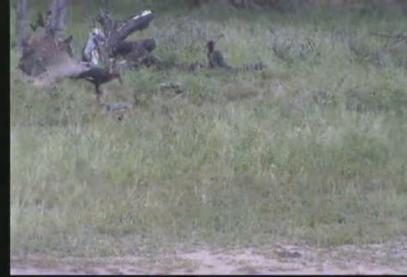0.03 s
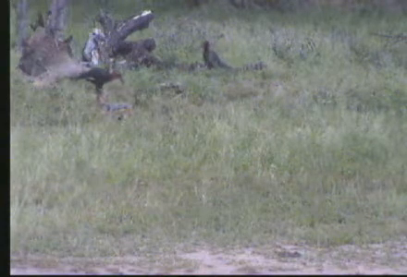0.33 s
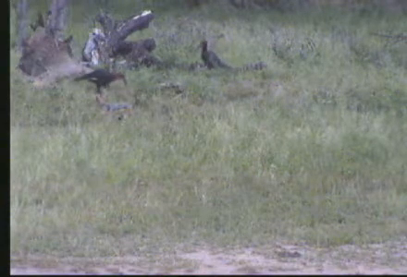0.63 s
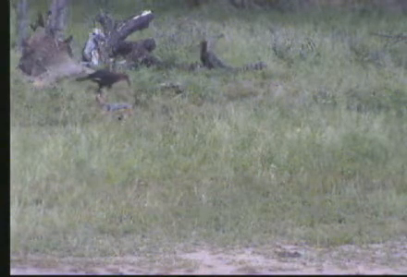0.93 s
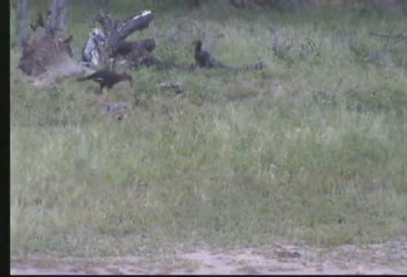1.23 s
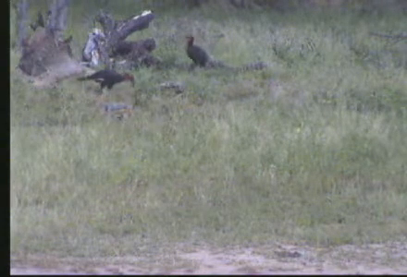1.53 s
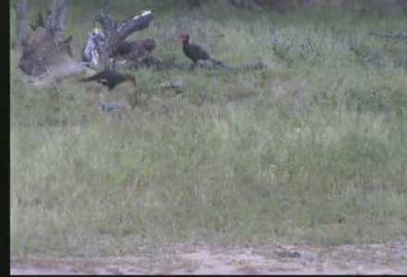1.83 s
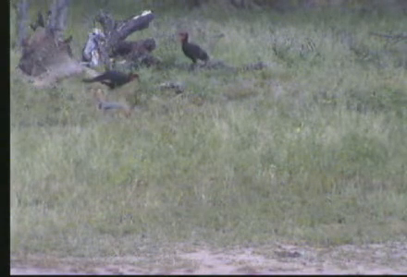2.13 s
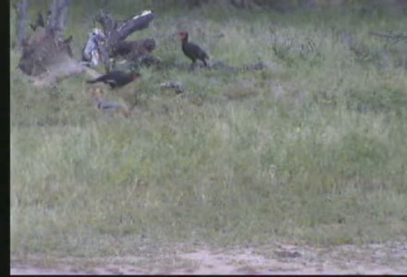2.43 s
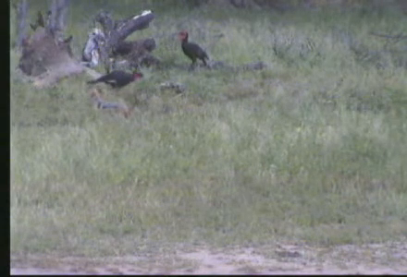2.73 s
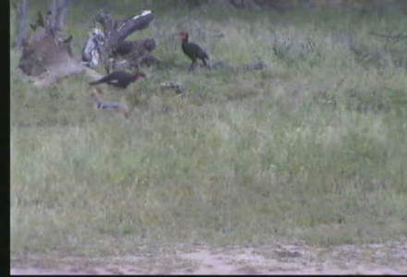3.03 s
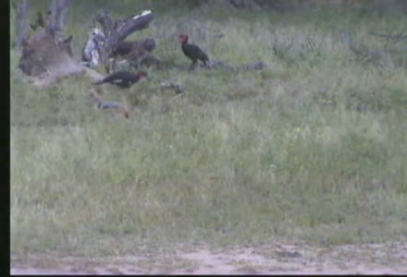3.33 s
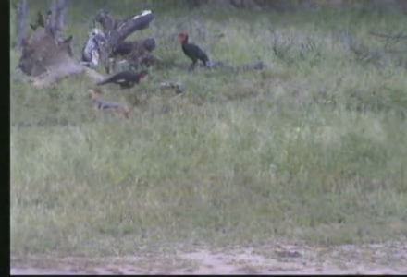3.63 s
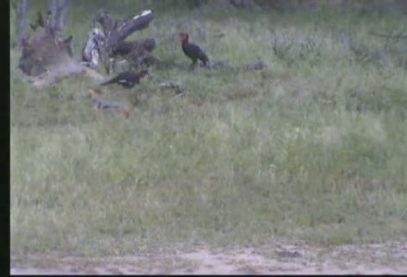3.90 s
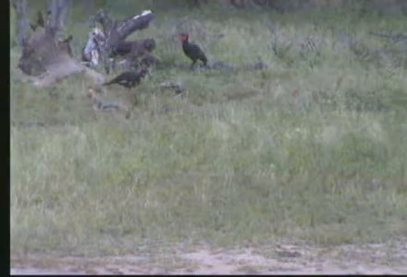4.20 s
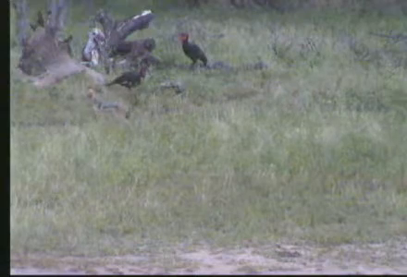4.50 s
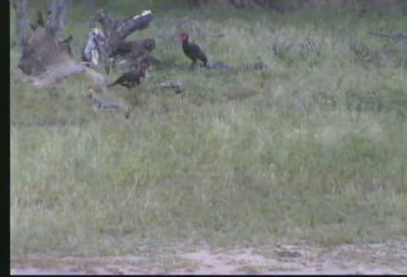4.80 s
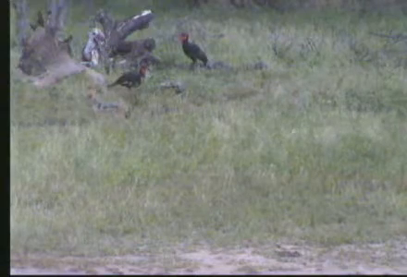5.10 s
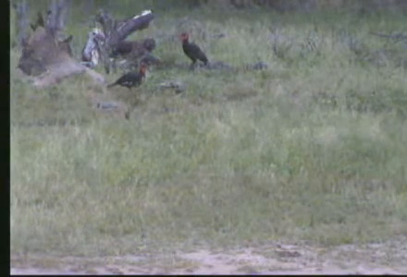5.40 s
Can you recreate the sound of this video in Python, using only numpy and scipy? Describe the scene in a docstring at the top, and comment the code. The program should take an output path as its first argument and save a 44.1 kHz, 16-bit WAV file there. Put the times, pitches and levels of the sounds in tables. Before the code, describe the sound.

In open grassy bush, a bird chatters some way off in two short phrases of quick trills and slurred notes, hoarse and lightly echoing. Then one loud, harsh, hissing screech bursts out close to the microphone, slightly overloading it, and weakens within a second. The chatter returns, followed by a faint, wavering far call. Steady hiss, a low breeze and a faint hum lie underneath.

```python
"""A bird chatters some way off in open grassy bush: short phrases of trills and slurred notes, hoarse
with throat turbulence and echoed by the scrub. Close to the microphone one harsh, hissing screech bursts
out, air rushing through a resonant throat; it starts and ends in sharp voice pulses and overloads the
camera. Behind it all: steady hiss, a low breeze, faint far calls, an insect and the camera's hum."""
import sys
import numpy as np
from scipy import signal
from scipy.fft import rfft, irfft, next_fast_len
from scipy.io import wavfile
from scipy.ndimage import uniform_filter1d, map_coordinates

SR = 44100
rng = np.random.default_rng(int(sys.argv[2]) if len(sys.argv) > 2 else 0)


def materialize(psi):
    """Save the field psi as 16-bit PCM at rate SR to the path in sys.argv[1].

    A 1-D psi becomes a single channel; in a 2-D psi each row is a channel.
    """
    bounded = np.clip(np.atleast_2d(psi).T, -1, 1)
    quanta = np.round(bounded * 32767).astype(np.int16)
    wavfile.write(sys.argv[1], SR, quanta)


N = 244755
TIME = np.arange(N) / SR


def amp(db):
    """Decibels to gain."""
    return 10 ** (np.asarray(db) / 20)


def unit(x):
    """Scale to rms 1."""
    return x / np.sqrt(np.mean(x ** 2) + 1e-20)


def along(points, hz):
    """Read (freq_hz, value) points at hz, on a log frequency axis."""
    freqs, values = np.transpose(points)
    return np.interp(np.log(hz + 1), np.log(freqs + 1), values)


def curves(rows):
    """One value per sample for each column after the time."""
    times, *columns = np.transpose(rows)
    return [np.interp(TIME, times, column) for column in columns]


def wobble(rate, size=N):
    """A smooth random curve, rate knots a second."""
    knots = rng.standard_normal(int(size * rate / SR) + 4)
    return map_coordinates(knots, [np.arange(size) * rate / SR])


def filtered(x, response):
    """Filter x by a gain given as a function of frequency."""
    size = next_fast_len(len(x) + SR // 4)
    return irfft(rfft(x, size) * response(np.fft.rfftfreq(size, 1 / SR)), size)[:len(x)]


def noise(spectrum):
    """Noise of rms 1, coloured by (freq_hz, level_db) points."""
    return unit(filtered(rng.standard_normal(N), lambda hz: amp(along(spectrum, hz))))


def narrow_noise(hz, width_hz):
    """Noise of rms 1 in one bell-shaped band."""
    return unit(filtered(rng.standard_normal(N), lambda f: np.exp(-2 * ((f - hz) / width_hz) ** 2)))


def patchy(x, depth_db, window):
    """x at rms 1, with random gains that change from band to band and moment to moment."""
    bands = signal.stft(x, nperseg=window)[2]
    patches = uniform_filter1d(rng.standard_normal(bands.shape), size=2, axis=0)
    patches = uniform_filter1d(patches, size=7, axis=1)
    return unit(signal.istft(bands * amp(depth_db * unit(patches)), nperseg=window)[1][:N])


def phase(hz):
    """Running phase of a moving pitch."""
    return 2 * np.pi * np.cumsum(hz) / SR


def ramp(start_s, length_s):
    """Rises from 0 to 1 over length_s after start_s."""
    return np.clip((TIME - start_s) / length_s, 0, 1)


def gate(t, start_s, end_s, edge_s):
    """1 between start and end, with soft edges."""
    return np.clip((t - start_s) / edge_s + .5, 0, 1) * np.clip((end_s - t) / edge_s + .5, 0, 1)


def span(start_s, end_s):
    """Sample indices from start to end."""
    return np.arange(max(int(start_s * SR), 0), min(int(end_s * SR), N))


def saturate(x, top, hardness):
    """Round off the peaks near top; the harder, the sharper the knee."""
    return x / (1 + abs(x / top) ** hardness) ** (1 / hardness)


def syrinx(hz, overtones_db, fuzz=0):
    """A bird's voice: a tone with overtones; fuzz smears them into breath, the higher ones most."""
    turn, size = phase(hz), len(hz)
    out = np.zeros(size)
    for k, db in enumerate([0, *overtones_db], 1):
        share = np.clip(fuzz * k, 0, 1)
        breath = wobble(800, size) * np.sin(k * turn) + wobble(800, size) * np.cos(k * turn)
        out += amp(db) * (np.sqrt(1 - share) * np.sin(k * turn) + np.sqrt(share / 2) * breath)
    return out


def slurred_notes(jitter=.05, flutter_db=3, edge_db=-6):
    """Each note bends along one arc; in rough ones the membrane shakes in pitch and strength."""
    # start_s, length_s, start_hz, middle_hz, end_hz, peak_db, peak_place (0-1), roughness (0-1),
    # harmonic2_db, harmonic3_db, harmonic4_db (against the first harmonic)
    notes = [(.16, .028, 1556, 1506, 1560, -30, 0.44, .3, -11.5, -15, -25),
             (.189, .125, 981, 973, 1010, -42, .3, 0.57, 7.5, -3, -4),
             (.29, 0.035, 1593, 1737, 1910, -30, 0.37, 0.42, -19, -10, -29),
             (.312, 0.0307, 892, 1027, 1110, -32.5, 0.83, 0.36, -4, -10, 2.5),
             (.342, 0.026, 1143, 1198, 1245, -32, 0.79, 0.19, 11.5, -2, 2),
             (.368, .04, 2720, 3014, 3540, -22, 0.48, 0.83, -27, -38, -40),
             (.386, .02, 3250, 3400, 3480, -24, .5, .9, -30, -40, -40),
             (.39, .03, 1590, 1740, 1830, -30.5, 0.54, 0.17, -1, -12.5, -28),
             (.402, 0.012, 2360, 2410, 2390, -22, .5, .2, -17, -40, -40),
             (.415, 0.05, 1824, 1870, 1862, -37, 0.52, 0.1, 11, 11.5, -20),
             (.679, 0.0836, 1800, 1644, 1658, -22, 0.58, 0.8, -11, -19, -21),
             (2.193, 0.015, 1728, 1914, 1790, -25, 0.9, 0.17, 5, 3, -24),
             (2.257, .07, 2950, 2726, 2880, -31, .1, 0.41, -18, -39, -41),
             (2.39, .05, 3200, 3230, 3180, -23, .55, 0.39, -31, -40, -40),
             (2.444, 0.031, 1880, 1860, 1830, -25, 0.29, 0.48, -6, 1, -28),
             (2.476, .057, 2560, 2075, 1730, -24, .1, .25, -23, -31, -34),
             (2.497, .058, 3210, 2595, 2390, -26, 0.35, .2, -20, -39, -40),
             (2.531, .049, 1728, 1653, 2260, -19, 0.6, 0.18, -15, -25, -36),
             (2.595, .055, 1380, 1530, 1578, -20.5, 0.93, .15, -24, -26, -28),
             (2.68, .04, 1620, 1600, 1580, -36.5, 0.33, .6, -11, -15, -25),
             (2.861, .012, 1850, 1920, 1900, -28, 0.45, 0.31, -5, -18, -30),
             (4.3, .09, 2850, 2680, 2540, -38.5, 0.7, .8, -25, -30, -40),
             (4.385, .05, 861, 959, 1123, -48, .65, 0.68, 14, 22, -3),
             (4.435, .05, 1200, 1402, 1563, -44, 0.55, 0.91, 17.5, 8.5, -12),
             (4.478, 0.037, 1526, 1720, 1830, -32.5, 0.44, .7, 7, -16, -25),
             (4.483, .04, 2600, 2347, 1870, -24.5, .45, 0.51, -13, -30, -38.5),
             (4.512, .05, 1880, 1938, 1940, -29.5, 0.19, .3, -7, -0.5, -25),
             (4.672, .125, 1451, 1617, 1950, -30, .2, 0.72, -1.5, -12, -17),
             (4.795, 0.0402, 3016, 2935, 2710, -15.5, 0.53, .08, -15, -40, -40),
             (4.832, .045, 2750, 2600, 2580, -33, .15, .25, -15, -40, -39),
             (4.837, .098, 1346, 1130, 1080, -34.5, .36, 1, -15, -10, -17),
             (4.916, 0.041, 1562, 1500, 1614, -23, 0.35, .15, -10.5, -20, -18)]
    out = np.zeros(N)
    for start_s, length_s, start_hz, middle_hz, end_hz, peak_db, place, rough, *overtones_db in notes:
        i = span(start_s - .005, start_s + length_s + .005)
        progress = np.clip((TIME[i] - start_s) / length_s, 0, 1)
        arc_hz = np.polyval(np.polyfit([0, .5, 1], [start_hz, middle_hz, end_hz], 2), progress)
        hz = arc_hz * (1 + jitter * rough * wobble(380, len(i)))
        tone = syrinx(hz, overtones_db, fuzz=.015 + .24 * rough)
        db = peak_db + np.interp(progress, [0, place, 1], [edge_db, 0, edge_db])
        db += flutter_db * rough * wobble(450, len(i))
        out[i] += np.sqrt(2) * amp(db) * tone * gate(TIME[i], start_s, start_s + length_s, .0055)
    return out


def trills(jitter=.025, flutter_db=1.5):
    """Runs of evenly spaced chirps; each swells near its top pitch, then drops ever faster as it fades."""
    # first_s, spacing_s, count, first_top_hz, last_top_hz, fall_hz, first_db, last_db,
    # chirp_length_s, overtone_db
    runs = [(.551, 0.013, 2, 2530, 2730, 250, -7.5, -10, 0.0066, -21),
            (0.57, 0.026, 5, 1530, 1492, 120, -23.5, -21.5, .013, -8),
            (.578, 0, 1, 2950, 2950, 850, -11.5, -10, .014, -12.5),
            (0.606, .022, 4, 2960, 2980, 1100, -9.5, -11, .017, -13),
            (0.683, 0.0077, 6, 2467, 2215, 563, -13.5, -22, .007, -17),
            (2.121, 0.0087, 6, 4340, 4440, 450, -17, -18.5, 0.0035, -31),
            (2.132, .0107, 5, 2900, 3150, 1300, -19.5, -16.5, .007, -7),
            (2.35, .0117, 8, 3150, 3350, 1700, -20, -12.5, .0085, -14),
            (4.492, 0.0055, 4, 2890, 2464, 663, -26, -25, .008, -18),
            (4.696, 0.017, 2, 2670, 2757, 800, -20, -14, 0.014, -12),
            (4.7275, .014, 2, 2900, 3100, 800, -5, -4, .008, -16),
            (4.758, 0, 1, 3190, 3200, 600, -12, -10, .004, -17)]
    # the throat favours overtones near one resonance: freq_hz, gain_db
    throat = [(2800, -6), (4300, -18), (5000, -8.5), (5700, 5), (6100, 0), (6500, -13.5), (7200, -26.5)]
    out = np.zeros(N)
    for (first_s, spacing_s, count, first_hz, last_hz, fall_hz,
         first_db, last_db, length_s, overtone_db) in runs:
        for n, progress in enumerate(np.linspace(0, 1, count)):
            middle_s = first_s + n * spacing_s
            db = first_db + progress * (last_db - first_db)
            top_hz = first_hz + progress * (last_hz - first_hz)
            i = span(middle_s - length_s, middle_s + length_s)
            offset = (TIME[i] - middle_s) / length_s
            hz = top_hz - fall_hz * np.clip(offset + .5, 0, 1.1) ** 1.6
            swell = np.exp(-6 * offset ** 2) * amp(db + flutter_db * wobble(700, len(i)))
            overtones_db = [overtone_db + along(throat, k * hz) for k in (2, 3, 4)]
            out[i] += swell * syrinx(hz * (1 + jitter * wobble(914, len(i))), overtones_db)
    return out


def rasp(mid_trim_db=-7, high_trim_db=-3, nasal_trim_db=-2, grain_db=1.5):
    """Turbulence in the chattering bird's throat: hoarse bursts, each with its own throat size."""
    # bursts: peak_s, rise_s, fall_s, mid_db, mid_centre_hz, high_db, nasal_db
    bursts = [(.17, 0.12, 0.28, -28.5, 2900, -35.5, -50), (.385, 0.062, 0.23, -19.5, 3430, -42, -50),
              (.585, 0.051, 0.19, -19, 2520, -28.5, -25), (.70, 0.24, 0.17, -23.5, 2500, -21, -31.5),
              (2.165, 0.064, 0.18, -22, 3000, -28.5, -30), (2.405, 0.2, .16, -19, 2800, -35.5, -31.5),
              (2.504, 0.17, 0.36, -20.5, 3020, -34, -38.5), (4.25, 0.44, .3, -35.5, 2800, -46, -55),
              (4.499, 0.4, 0.14, -24, 2820, -40, -52), (4.56, .042, .45, -26.5, 2900, -31.5, -33),
              (4.725, 0.058, .33, -18, 2800, -22, -25), (4.93, 0.17, 0.21, -27, 3000, -30, -33),
              (5.25, 0.19, 0.35, -37, 2900, -30.5, -46)]
    # the rasp's middle band, high band and narrow nasal ring: freq_hz, level_db
    mid_band = [(900, -25), (1500, -7), (2100, -4), (2900, -0.5), (3700, -3), (4500, -10.5), (5500, -30.5)]
    high_band = [(3500, -49), (4700, -3), (5300, -2.5), (5750, -2.5), (6300, 2.5), (7100, -9)]
    nasal_band = [(4900, -38.5), (5400, -6.5), (5680, 0), (5950, -9.5), (6400, -40)]
    mid, high_gain, nasal_gain = np.zeros((3, N))
    for peak_s, rise_s, fall_s, mid_db, centre_hz, high_db, nasal_db in bursts:
        fade_db = 15 * np.maximum((peak_s - TIME) / rise_s, (TIME - peak_s) / fall_s)
        throat = [(hz * centre_hz / 2900, db) for hz, db in mid_band]  # moves the peak to centre_hz
        mid += amp(mid_db + mid_trim_db - fade_db) * noise(throat)
        high_gain = np.hypot(high_gain, amp(high_db + high_trim_db - fade_db))
        nasal_gain = np.hypot(nasal_gain, amp(nasal_db + nasal_trim_db - fade_db))
    grain = unit(amp(grain_db * wobble(300)))
    return grain * (mid + high_gain * noise(high_band) + nasal_gain * noise(nasal_band))


def effort(end_s, sag_start_s=3.02, drop_start_s=3.43, sag_db_per_s=15):
    """The screech's strength in dB against its peak: it holds, sags, drops to a weak tail and lets go."""
    sag_db = sag_db_per_s * np.clip(TIME - sag_start_s, 0, drop_start_s - sag_start_s)
    drop_db = 9 * ramp(drop_start_s, .078)
    release_db = 7 * ramp(end_s - .045, .045)
    return -sag_db - drop_db - release_db


def whistle(hz):
    """A narrow throat resonance of rms 1, shaken in pitch and strength by the airflow."""
    turn = phase(hz * (1 + .012 * wobble(70)))
    return unit(wobble(230) * np.sin(turn) + wobble(230) * np.cos(turn))


def screech(start_s=2.888, end_s=3.736, level_db=-7, throat_hz=6010, mouth_hz=2800, sink_hz_per_db=33.5):
    """Chaotic airflow through a throat that opens, holds and closes, with resonances riding on it."""
    # the throat's four shapes in turn: freq_hz, level_db
    opening = [(710, -60), (1200, -25), (1970, -19.5), (2150, -15), (2520, -25), (2710, -11), (3160, -3),
               (3700, 1), (4880, -3), (5980, -32), (6820, -16.5), (8870, -32), (15000, -120)]
    held = [(710, -57.5), (1200, -43), (1450, -23.5), (2120, -22.5), (2590, -8.5), (2790, -4.5),
            (3270, -8.5), (3870, -3.5), (4250, -10), (4850, -2.5), (5290, -6), (5770, 2.5), (5980, -3),
            (6340, -3), (6820, -4), (8870, -41.5), (15000, -120)]
    closing = [(710, -50.5), (1200, -35.5), (1480, -22.5), (1680, -26.5), (2010, -27.5), (2650, -7),
               (2890, -10), (3130, -14), (3550, -5.5), (4440, -11.5), (4710, -5.5), (5400, 0.5), (5980, 0),
               (6250, -4.5), (6820, -5.5), (8870, -55), (15000, -120)]
    tail = [(710, -45), (1480, -15), (2010, -26), (2650, 0.5), (2890, -4.5), (3130, -9), (3600, -3),
            (4400, -8), (4800, -1), (5450, 0.5), (5980, -3), (6300, -14), (6820, -18.5), (8870, -54),
            (15000, -120)]
    stage = ramp(2.898, .115) + ramp(3.17, .22) + ramp(3.45, .067)  # 0 opening to 3 tail
    rush = np.zeros(N)
    for k, shape in enumerate([opening, held, closing, tail]):
        crossfade = np.sqrt(np.clip(1 - abs(stage - k), 0, 1))
        rush += crossfade * patchy(noise(shape), depth_db=3, window=512)
    # the upper resonances scoop up at the start and sink with the effort
    effort_db = effort(end_s)
    scoop_hz = 593 * np.exp(-abs(TIME - start_s) / .12)
    upper_hz = throat_hz + sink_hz_per_db * effort_db - scoop_hz
    ring = amp(-3) * whistle(upper_hz) + amp(-13) * whistle(.86 * upper_hz)
    ring += amp(-19) * whistle(np.full(N, mouth_hz))
    voice = rush + ramp(3.0, .15) * amp(.37 * effort_db) * ring
    return amp(level_db + effort_db - .3 * wobble(220)) * voice * gate(TIME, start_s, end_s, .0062)


def voice_pulses(half_length_s=.006, sag_hz=300):
    """The voice catches in single sagging rings as the screech starts and runs out, each spitting air."""
    # pulses: middle_s, pitch_hz, ring_db, spit_db
    catches = [(2.8864, 3740, 3, -14), (2.9043, 3760, 8, -11), (2.9227, 3800, 4, -10),
               (2.9425, 3600, -5, -18), (3.375, 4900, 0, -16), (3.430, 4850, -1, -10),
               (3.4732, 5400, -3.5, -10.5), (3.542, 5430, -8, -14), (3.582, 5260, -6.5, -13.5),
               (3.627, 5480, -2.5, -13), (3.673, 5650, -12, -15)]
    # the spit of air: freq_hz, level_db
    spit = [(1500, -44), (2500, -20), (3800, -9.5), (4300, -2), (5000, -0.5), (5500, 1), (6000, -2),
            (7000, -22), (9000, -61)]
    out, air = np.zeros(N), noise(spit)
    for middle_s, pitch_hz, ring_db, spit_db in catches:
        i = span(middle_s - half_length_s, middle_s + half_length_s)
        offset = (TIME[i] - middle_s) / half_length_s
        hz = pitch_hz * (1 + .015 * wobble(600, len(i))) - sag_hz * offset
        out[i] += np.exp(-10 * offset ** 2) * (amp(ring_db) * np.sin(phase(hz)) + amp(spit_db) * air[i])
    return out


def scrub_echo(x, near_db, near_t60_s, far_db, far_t60_s, build_s=.017):
    """Nearby ground and bushes scatter the sound; farther trees add a longer tail."""
    # the echo's colour: freq_hz, gain_db
    colour = [(500, -5), (1500, 3.5), (2800, 6), (4300, 8.5), (5700, -4.5), (7000, 1.5)]
    t, response = TIME[:SR], np.zeros(SR)
    for db, t60_s in [(near_db, near_t60_s), (far_db, far_t60_s)]:
        scatter = rng.standard_normal(SR) * amp(-60 * t / t60_s) * (1 - np.exp(-t / build_s))
        response += amp(db) * unit(scatter) / np.sqrt(SR)
    return filtered(signal.fftconvolve(x, response)[:N], lambda hz: amp(along(colour, hz)))


def far_birds():
    """Faint calls, blurred to a fuzz by the bush between them and the microphone."""
    # calls: middle_s, length_s, pitch_hz, width_hz, level_db
    calls = [(1.273, 0.11, 1500, 250, -49), (1.6, .25, 2960, 400, -53), (1.97, 0.19, 1040, 200, -43),
             (2.294, 0.095, 930, 160, -40), (2.477, .07, 1140, 140, -43.5), (2.82, .09, 1800, 400, -39.5),
             (2.82, .07, 390, 170, -35), (3.7, .17, 480, 300, -33), (4, .2, 560, 250, -37),
             (4.24, 0.084, 2780, 260, -39)]
    return sum(amp(db) * np.exp(-2 * ((TIME - middle_s) / length_s) ** 2) * narrow_noise(hz, width_hz)
               for middle_s, length_s, hz, width_hz, db in calls)


def far_held_call(waver_db=2, echo_db=-40):
    """One distant bird holds a wavering note; its echo swells in and stays."""
    # the note's course: time_s, pitch_hz, level_db
    course = [(5.12, 1700, -70), (5.175, 1710, -39), (5.22, 1930, -39), (5.29, 1700, -38.5),
              (5.34, 1770, -38), (5.43, 1720, -43), (5.475, 1770, -34), (5.5, 1860, -42),
              (5.535, 1710, -34)]
    # its echo: freq_hz, level_db
    echo_colour = [(1200, -45), (1550, -7.5), (1750, 1.5), (1950, -16), (2400, -32)]
    hz, db = curves(course)
    strength = amp(db + waver_db * wobble(40))
    tone = unit(syrinx(hz * (1 + .015 * wobble(90)), [], fuzz=.4))
    return strength * tone + amp(echo_db) * ramp(5.13, .11) * noise(echo_colour)


def far_insect():
    """An insect sizzles briefly in the distance."""
    # the sizzle: start_s, end_s, pitch_hz, width_hz, level_db
    sizzle = (1.6, 2, 6700, 650, -46.5)
    start_s, end_s, hz, width_hz, db = sizzle
    return amp(db) * gate(TIME, start_s, end_s, .1) * narrow_noise(hz, width_hz)


def breeze():
    """A low breeze, with two brief low thuds under the bird's croaks."""
    # strength of the low noise, with the thuds at 0.71 s and 4.78 s: time_s, level_db
    low_levels = [(0.0, -44.5), (0.63, -43.5), (0.71, -35), (0.8, -44.5), (2.54, -41), (2.66, -33.5),
                  (2.74, -41), (2.81, -33.5), (3.03, -38.5), (3.37, -33), (3.52, -38), (3.69, -32.5),
                  (3.85, -36), (3.99, -35.5), (4.38, -38.5), (4.7, -38.5), (4.78, -33), (4.79, -35),
                  (5.55, -37.5)]
    # its colour: freq_hz, level_db
    colour = [(30, -28), (70, -15.5), (150, -20.5), (230, -8.5), (350, -3.5), (520, -0.5), (700, -3.5),
              (1000, -11.5), (1800, -22), (4000, -70)]
    return amp(curves(low_levels)[0]) * patchy(noise(colour), depth_db=3, window=1024)


def camera_hum(sag_start_s=2.17, sag_db=5):
    """The camera hums faintly; its third partial weakens partway through."""
    # partials: pitch_hz, level_db
    partials = [(50, -50), (100, -64), (150, -53.5), (200, -63.5), (250, -56)]
    out = np.zeros(N)
    for k, (hz, db) in enumerate(partials, 1):
        loss_db = sag_db * ramp(sag_start_s, .2) if k == 3 else 0
        out += np.sqrt(2) * amp(db - loss_db) * np.sin(2 * np.pi * (hz * TIME + rng.random()))
    return out


def hiss(level_db=-36):
    """A steady hiss that shifts softly in colour."""
    # its average colour: freq_hz, level_db
    colour = [(25, -9.5), (60, -11.5), (110, -12), (200, -18), (300, -23.5), (440, -12.5), (600, 2),
              (800, -2), (1200, -3), (2000, -2.5), (2850, 0), (4100, -1), (4700, -2.5), (5600, 0.5),
              (7000, -10)]
    return amp(level_db) * patchy(noise(colour), depth_db=1.4, window=1024)


def scene():
    """The chatter is farther off and wetter than the screech; one microphone feeds both channels."""
    chatter = slurred_notes() + trills()
    close = screech() + voice_pulses()
    ground_bounce = amp(-11) * np.interp(TIME - .007, TIME, chatter)
    chatter_echo = scrub_echo(chatter, near_db=-15, near_t60_s=.13, far_db=-15, far_t60_s=.7)
    close_echo = scrub_echo(close, near_db=-29.5, near_t60_s=.16, far_db=-23, far_t60_s=2.74)
    mono = chatter + rasp() + ground_bounce + chatter_echo + close + close_echo
    mono += far_birds() + far_held_call() + far_insect() + breeze() + camera_hum() + hiss()
    return np.array([mono, mono])


def record(dry, band_hz=7040, top_hz=16000):
    """The microphone stage saturates softly, the band is narrow, and the loudest peaks fizz."""
    # the output dulls the overload's top: freq_hz, gain_db
    fizz_tilt = [(7200, 0), (9000, -1), (11300, 0), (13000, -3), (16000, -4)]
    channels = []
    for soft in saturate(dry, top=1.1, hardness=6):
        narrow = filtered(soft, lambda hz: 1 / np.sqrt(1 + (hz / band_hz) ** 200))
        clipped = saturate(narrow, top=1, hardness=40)
        channels.append(filtered(clipped, lambda hz: amp(along(fizz_tilt, hz)) * (hz < top_hz)))
    return np.array(channels)


dry = scene()
out = record(dry)
materialize(out)
```